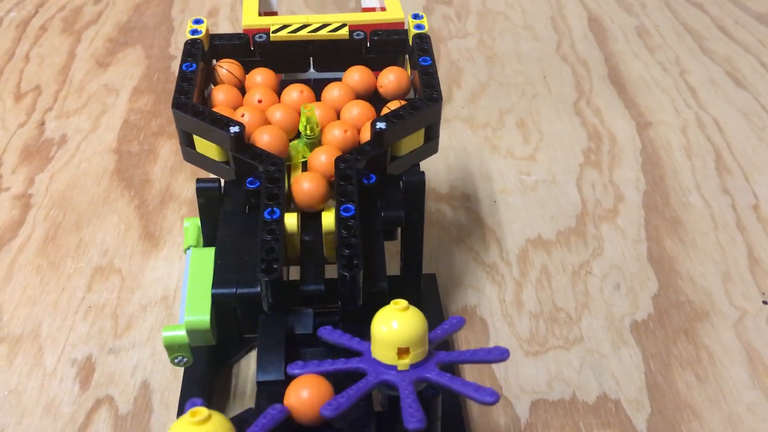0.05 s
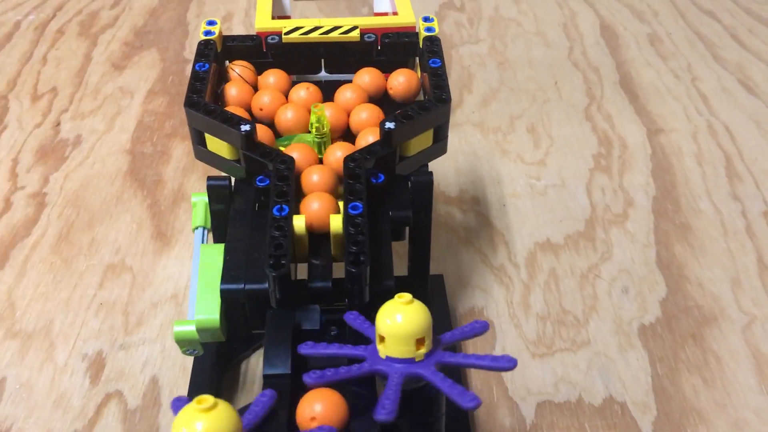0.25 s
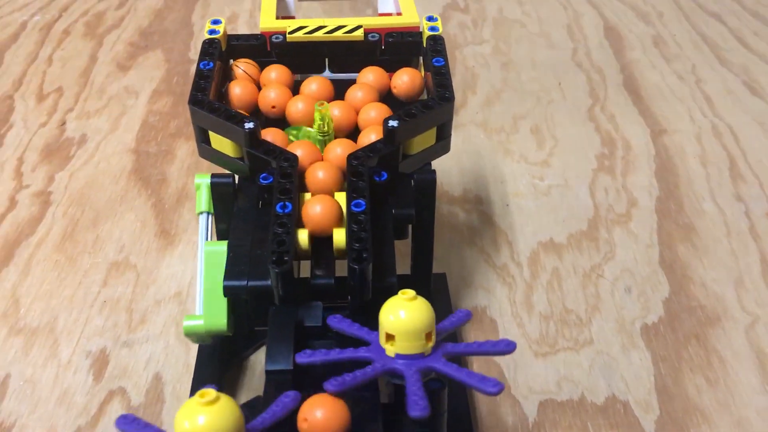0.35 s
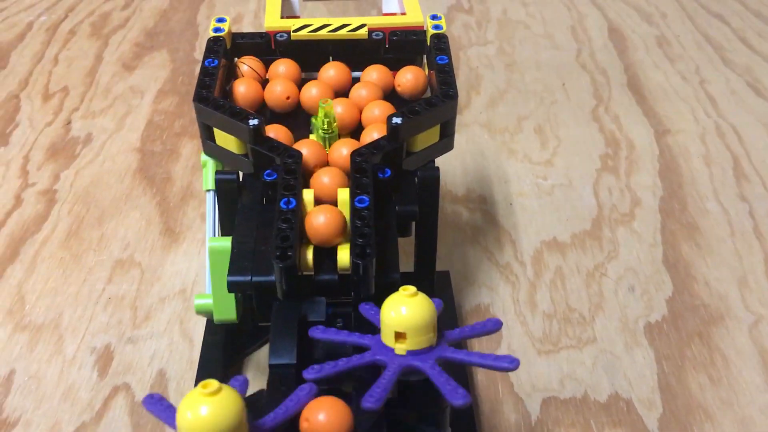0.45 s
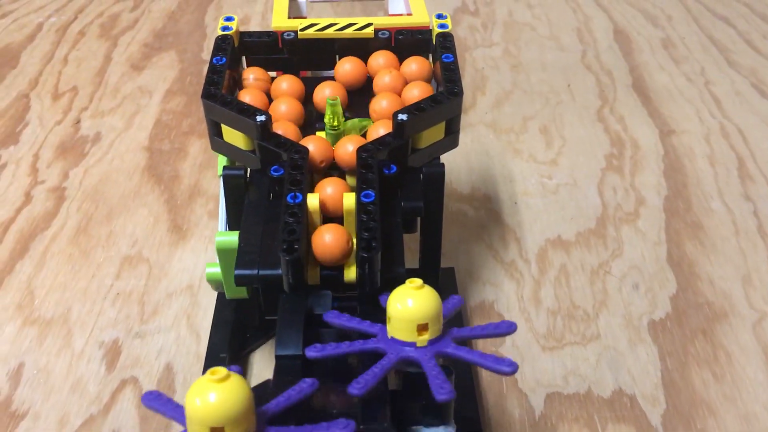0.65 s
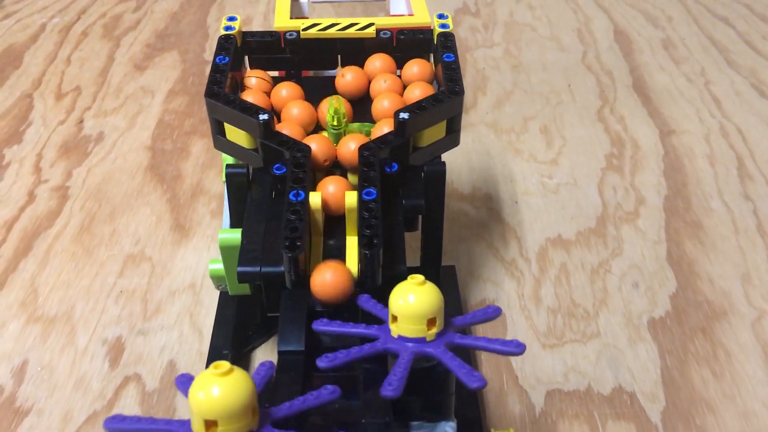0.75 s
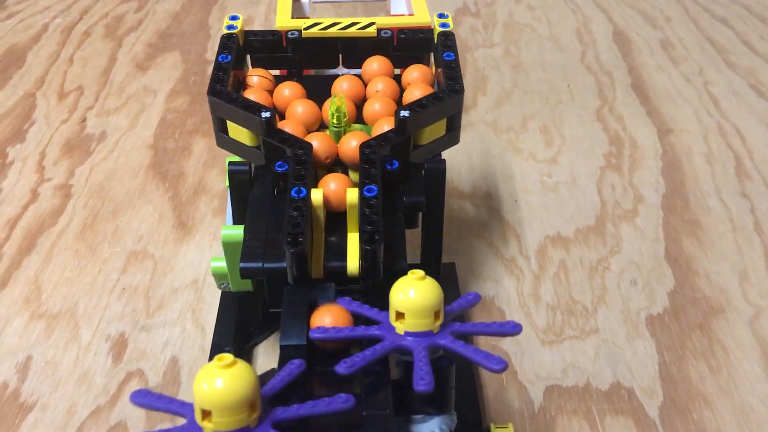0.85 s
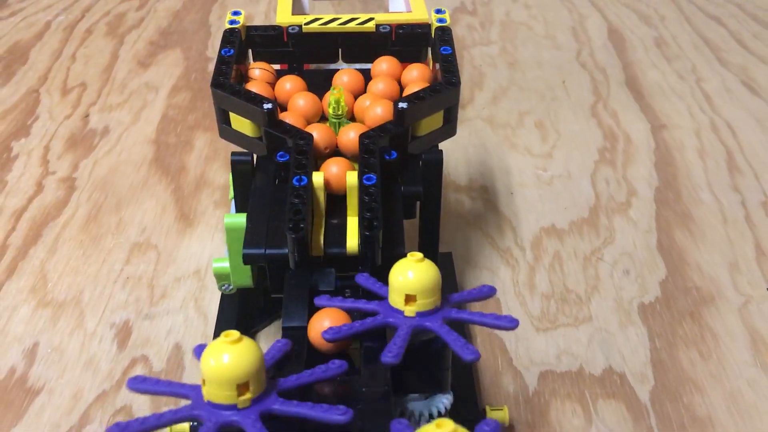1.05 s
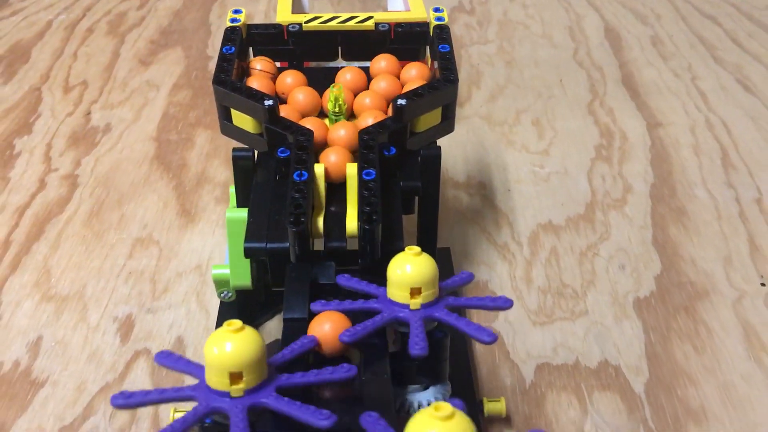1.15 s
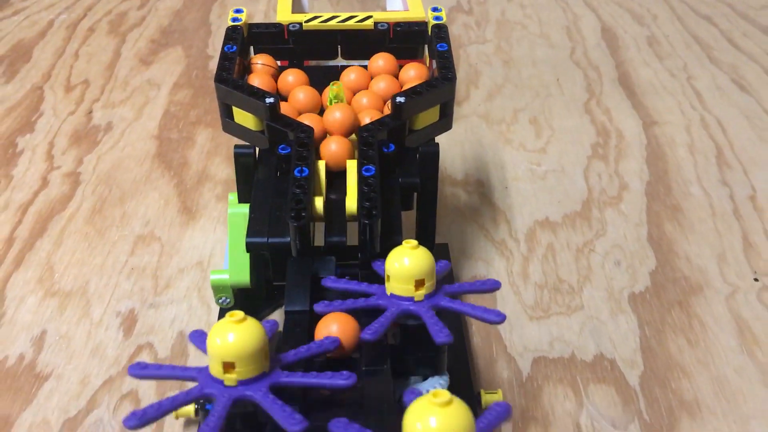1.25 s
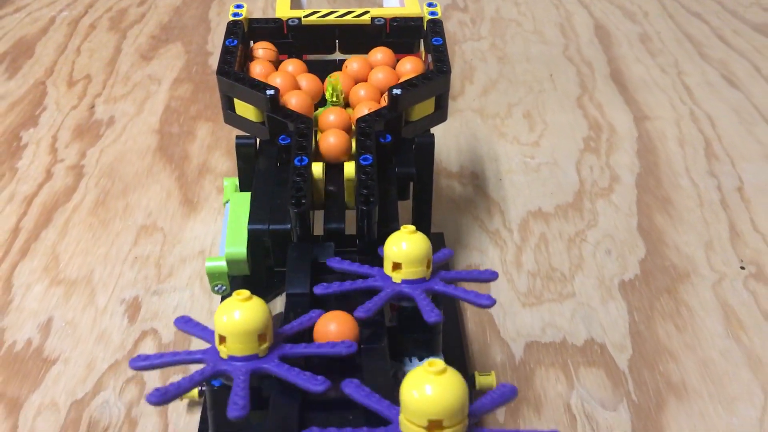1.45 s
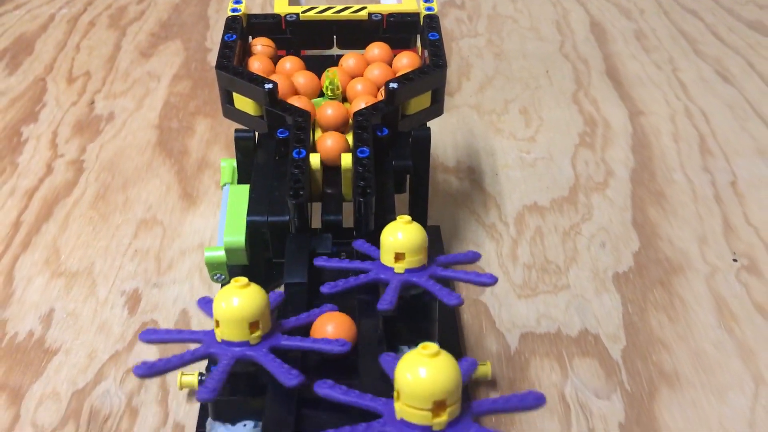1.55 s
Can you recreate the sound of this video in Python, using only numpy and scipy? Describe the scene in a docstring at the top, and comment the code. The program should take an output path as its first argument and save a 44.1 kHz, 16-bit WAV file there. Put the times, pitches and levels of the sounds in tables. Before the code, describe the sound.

Small plastic balls click and clack through a toy brick machine over a quiet motor whirr.

```python
"""Toy brick ball machine

Small hard plastic balls feed from a hopper through a motor-driven brick machine on a plywood table.
They click together, tick on bricks and knock in the chute, each hit a crack, a ring and a brief shake.
A lever drops with one loud clack that rings the frame and shakes the table.
The motor and its gears whirr quietly underneath, in a small room."""
import sys
import numpy as np
from scipy import signal
from scipy.fft import rfft, irfft
from scipy.io import wavfile

SR = 44100
rng = np.random.default_rng(int(sys.argv[2]) if len(sys.argv) > 2 else 0)


def unload_wav(signal):
    """Save mono or channel-first audio to the path in sys.argv[1] as 16-bit WAV at rate SR, clipped to [-1, 1]."""
    wavfile.write(
        sys.argv[1],
        SR,
        np.round(np.clip(np.atleast_2d(signal).T, -1, 1) * 32767).astype(np.int16),
    )


N = 70560


def amp(db):
    """Decibels to gain."""
    return 10 ** (np.asarray(db) / 20)


def unit(x):
    """Scales to an energy of one."""
    return x / np.sqrt(np.sum(x ** 2) + 1e-20)


def curve_at(points, hz):
    """Reads a curve on a log-frequency axis."""
    freqs, values = np.transpose(points)
    return np.interp(np.log(hz + 1), np.log(freqs + 1), values)


def add(mix, start_s, sound):
    """Mixes a sound in at its start time."""
    part = mix[round(start_s * SR):][:len(sound)]
    part += sound[:len(part)]


def equalise(x, eq):
    """Minimum-phase EQ through points of freq_hz, gain_db."""
    log_gain = np.log(amp(curve_at(eq, abs(np.fft.fftfreq(8192, 1 / SR)))))
    taps = np.fft.ifft(np.exp(np.conj(signal.hilbert(log_gain)))).real[:4096]
    return signal.fftconvolve(x, taps)[:len(x)]


def tail(decay, size):
    """Dense random echoes, each band dying at its own speed."""
    t, hz = np.arange(size) / SR, np.fft.rfftfreq(size, 1 / SR)
    noise = rfft(rng.choice([-1., 1.], size))
    centres = np.transpose(decay)[0]
    echoes = np.zeros(size)
    for centre, t60 in decay:
        band = irfft(noise * curve_at(np.c_[centres, centres == centre], hz), size)
        echoes += band * amp(-60 * t / t60)
    return unit(echoes)


def drift(rate_hz):
    """Slow random wander with an rms of one."""
    lowpass = np.exp(-(np.fft.rfftfreq(N, 1 / SR) / rate_hz) ** 2)
    return unit(irfft(rfft(rng.standard_normal(N)) * lowpass, N)) * np.sqrt(N)


def grains(per_s, max_db, spread_db=4):
    """Randomly timed impulses of uneven strength."""
    impulses = (rng.random(N) < per_s / SR) * rng.choice([-1, 1], N)
    return impulses * amp(np.minimum(spread_db * rng.exponential(1, N), max_db))


def strike(tilt_db_per_octave, modes, eq, decay, crack_db, ring_db, shake_db, size=8192):
    """One contact: a crack spread by bending waves, ringing modes and the shake of nearby bricks."""
    t, freqs = np.arange(size) / SR, np.fft.rfftfreq(size, 1 / SR)
    ring = unit(sum((-1) ** k * amp(db - 60 * t / t60) * np.sin(2 * np.pi * hz * t)
                    for k, (hz, db, t60) in enumerate(modes)))
    bend_delay_s = 0.000496  # at 1 kHz; the treble arrives first
    bending_wave = irfft(np.exp(-4j * np.pi * bend_delay_s * np.sqrt(1000 * freqs)), size)
    crack = unit(equalise(bending_wave, eq))
    shake = unit(equalise(tail(decay, size), eq))
    hit = amp(crack_db) * crack + amp(ring_db) * ring + amp(shake_db) * shake
    return unit(equalise(hit, [(750, 0), (12000, 4 * tilt_db_per_octave)]))


def strike_spot(hit, hz, boost_db, edge_ratio=1.35):
    """The spot that is struck favours one band of the ring."""
    return unit(equalise(hit, [(hz / edge_ratio, 0), (hz, boost_db), (hz * edge_ratio, 0)]))


# Shake dying away in the loose brickwork: freq_hz, t60_s
BRICKWORK_DECAY = [(300, 0.078), (1500, 0.07), (4500, 0.037), (9000, 0.019), (15000, 0.015)]
# Motor and gear tones: pitch_hz, relative_level_db
GEAR_TONES = [(113, -60), (150, -57.5), (344, -68.5), (457, -64), (912, -55.5), (1060, -60), (1389, -62),
              (1620, -58), (1965, -56.5), (2125, -61.5), (2295, -55.5), (2900, -65.5), (4312, -60.5)]
# Bed of gear noise and room hum: freq_hz, gain_db
WHIRR_EQ = [(20, -22), (40, -1.5), (65, 10.5), (100, -2.5), (155, -2), (210, -8.5), (350, -3.5), (540, -15),
            (700, -11.5), (950, -3), (1500, -6), (2100, 2.5), (2700, -5), (4400, -7.5), (6300, -4.5),
            (7500, -18.5), (8800, -6.5), (10300, -16), (11600, -7.5), (15500, -16.5)]


def motor(waver=0.005997, flutter_db=4, swell_db=1.26):
    """Wavering gear tones over a soft whirr and the fine rattle of teeth."""
    shared_drift = drift(6.15)
    whine = np.zeros(N)
    for hz, db in GEAR_TONES:
        level = np.sqrt(2) * amp(db + flutter_db * drift(18))
        speed = 1 + waver * (shared_drift + drift(42.2))
        whine += level * np.sin(2 * np.pi * hz * np.cumsum(speed) / SR)
    whirr = unit(equalise(rng.standard_normal(N), WHIRR_EQ)) * amp(swell_db * drift(24))
    teeth = grains(per_s=260, max_db=12)
    rattle = signal.fftconvolve(teeth, tail(BRICKWORK_DECAY, size=2048))[:N]
    rattle_eq = [(200, -28), (700, -13.5), (1100, -5), (5000, -11.5), (9000, -11.5), (16000, -24)]
    rattle = unit(equalise(rattle, rattle_eq))
    return amp(-1.5) * whine + np.sqrt(N) * (amp(-42) * whirr + amp(-47) * rattle)


# Short, high ring of a ball: pitch_hz, level_db, t60_s
BALL_MODES = [(2280, -18, .03), (3230, -14, .04), (3915, -6, .03), (4325, 0, .032), (4600, -7, .02),
              (5075, -4, .025), (5400, -10, .022), (5717, -6, .022), (6245, -11, .025), (6578, -9, .022),
              (7074, -9, .016), (8450, -10, .014)]
# Bright tone of a ball's crack and shake: freq_hz, gain_db
BALL_EQ = [(100, -35), (700, -29.5), (1400, -9), (2700, -14), (4400, 0.5), (6500, -1), (7800, -7.5),
           (10000, -7), (12500, -16), (16000, -41)]
# Swell and ebb of the jostling in the hopper: time_s, level_db
JOSTLE_ENVELOPE = [(0, -44.5), (.08, -44), (.14, -53), (.56, -81), (.63, -41), (.72, -52), (1.02, -53),
                   (1.2, -53), (1.35, -45), (1.45, -47.5), (1.6, -55)]


def hopper_jostle():
    """Many faint random contacts as the heap of balls settles."""
    touches = grains(per_s=350, max_db=8)
    click = strike(-2, BALL_MODES, BALL_EQ, BRICKWORK_DECAY, crack_db=-10, ring_db=-7.5, shake_db=-5)
    jostle = unit(signal.fftconvolve(touches, click)[:N]) * np.sqrt(N)
    return jostle * amp(np.interp(np.arange(N) / SR, *np.transpose(JOSTLE_ENVELOPE)))


# Hollow ring of the chute: pitch_hz, level_db, t60_s
CHUTE_MODES = [(901, -11, 0.074), (1169, 0.5, 0.055), (1560, -7, .05), (1702, 1.5, 0.053), (1857, 6, 0.054),
               (2000, -13, 0.061), (2445, -2, 0.04)]
# Dull tone of its crack and shake: freq_hz, gain_db
CHUTE_EQ = [(100, -18), (260, -9), (400, -9), (650, -14), (1100, -2), (2200, -2), (3000, -10), (6000, -20),
            (16000, -55)]
# Balls bumping along the chute: start_s, level_db, tilt_db_per_octave
CHUTE_KNOCKS = [(.015, -10.5, 3), (0.11, -22, -4), (0.334, 2, 4), (0.3434, 1, 0), (0.3586, -4, 2.5),
                (.4738, -10.5, 0), (.507, -10.5, -1), (0.5209, -6.5, -3), (.526, -12, -5),
                (0.5372, -6, -2.5), (0.5505, -8, 3), (0.7492, -7, 5), (.776, -12, 2.5), (0.86, -7.5, -3),
                (.917, -11, -5), (1.142, -10, 4), (1.1676, -8, 0), (1.172, -21, 3), (1.306, -1.5, 2),
                (1.3133, -7.5, 2.5), (1.358, -12.5, 0)]


def chute_knocks(detune=0.039):
    """Balls knock their way down the chute, where each spot rings a little differently."""
    out = np.zeros(N)
    for start_s, level_db, tilt in CHUTE_KNOCKS:
        modes = [(hz * (1 + detune * rng.uniform(-1.05, 1)), db, t60) for hz, db, t60 in CHUTE_MODES]
        knock = strike(tilt, modes, CHUTE_EQ, BRICKWORK_DECAY, crack_db=-18.5, ring_db=-2.5, shake_db=-4)
        add(out, start_s, amp(level_db) * knock)
    return out


# Ring of a brick: pitch_hz, level_db, t60_s
BRICK_MODES = [(1958, 3.5, 0.078), (3190, -9.5, 0.051), (3500, 3, 0.09), (4110, -11, 0.034),
               (5400, -21, 0.025), (5940, 11.5, 0.024), (8040, -43, .02)]
# Sharp tone of its crack and shake: freq_hz, gain_db
BRICK_EQ = [(100, -12.5), (600, -13.5), (1200, -5), (2600, -3.5), (4000, -1), (6300, -2.5), (9500, -7.5),
            (10800, -15.5), (16000, -12)]
# Ball or lever on a brick: start_s, level_db, tilt_db_per_octave, boost_hz, crack_db
BRICK_TICKS = [(0.0175, -18, -3, 4430, 6), (0.033, -12, -4, 4260, -12), (0.2248, 0.5, 1, 6800, 0.5),
               (0.2261, -6, 3, 12500, -19), (.236, -27, 9, 6500, 0), (0.2874, 4, 2.5, 4000, -3.5),
               (0.457, -21.5, 5, 8500, -5), (0.6775, -2, -1.5, 2870, 1), (0.689, -8, -1, 4130, 0),
               (0.7442, -9, -2.5, 4200, -11), (.8335, -11.5, -4.5, 4450, 6), (0.8432, -3, -1, 4540, -2.5),
               (.8576, -9, -4.5, 2500, -5), (1.097, -8.5, -2.5, 5900, -3), (1.2623, -1, 0.1, 3110, -3.5),
               (1.3102, -4.5, 1, 5260, -16), (1.34, -8, 0, 3860, -3), (1.5244, -6, 1.5, 3500, -4)]


def brick_ticks():
    """Dry, sharp ticks as the bricks of the hopper are struck."""
    out = np.zeros(N)
    for start_s, level_db, tilt, hz, crack_db in BRICK_TICKS:
        tick = strike(tilt, BRICK_MODES, BRICK_EQ, BRICKWORK_DECAY, crack_db, ring_db=-2.5, shake_db=3.5)
        add(out, start_s, amp(level_db) * strike_spot(tick, hz, boost_db=6))
    return out


# Early reflections off the machine's walls and the table: delay_s, gain_db
REFLECTIONS = [(.0016, -13), (.0029, -23), (.0054, -17.5)]
# Ball on ball: start_s, level_db, tilt_db_per_octave, boost_hz, crack_db
BALL_CLICKS = [(0.2183, -6, -7, 4340, -17), (0.2598, -14, -6, 4270, -12), (.302, -12.5, -7, 4730, 9),
               (0.6123, -15, 3, 4600, -9), (0.6243, -11, -7.5, 4540, -6), (0.9143, 8.5, .5, 5600, 2.5),
               (.967, 7, 0, 3980, -9.5), (0.9957, 1, -2, 4000, -7), (1.013, -8, -3.5, 4170, -4),
               (1.0823, -5.5, -4.5, 4300, 3), (1.4937, -20, 5, 5400, -8), (1.509, -5.5, -7, 4860, 5)]


def ball_clicks():
    """Hard balls click together with a short, high ring that echoes between the bricks."""
    out = np.zeros(N)
    for start_s, level_db, tilt, hz, crack_db in BALL_CLICKS:
        click = strike(tilt, BALL_MODES, BALL_EQ, BRICKWORK_DECAY, crack_db, ring_db=-0.5, shake_db=-3)
        click = amp(level_db) * strike_spot(click, hz, boost_db=4.5)
        add(out, start_s, click)
        for delay_s, gain_db in REFLECTIONS:
            add(out, start_s + delay_s, amp(gain_db) * click)
    return out


# Ring of the whole frame: pitch_hz, level_db, t60_s
FRAME_MODES = [(155, -21, .18), (250, -15, .1), (322, -12, .11), (375, -9, .08), (425, -9, .1),
               (571, -13, .09), (745, 1, .05), (846, 4, .08), (905, -4, .05), (1067, 2, .08),
               (1162, -2, .09), (1216, -4, .09), (1421, 0, .06), (1530, -2, .05), (1627, 2, .06),
               (1764, 0, .06), (1827, -5, .06), (2330, -7, .05), (2495, -5, .06), (2555, -7, .06),
               (3000, -10, .04), (3273, -8, .04), (3591, -9, .04)]
# Mid-heavy tone of its crack and shake: freq_hz, gain_db
FRAME_EQ = [(50, -21), (150, -17.5), (380, -2), (620, -11), (850, 3.5), (1700, 2), (2100, -3.5),
            (3500, -5.5), (4500, -14.5), (9000, -17.5), (11000, -24.5), (16000, -30)]
# Shake dying away in the frame: freq_hz, t60_s
FRAME_DECAY = [(150, 0.13), (800, 0.076), (2000, 0.027), (5000, 0.092), (14000, 0.066)]
# The lever's landing and chatter: start_s, level_db, tilt_db_per_octave, ring_db
LEVER_HITS = [(.3145, 15, .5, 1.5), (0.3158, 11.5, 1, -37), (.32, 7.5, -2, -33), (0.3417, -2, -1.5, -32),
              (.36, -3, -1.5, -17), (0.386, -15.5, -5.5, -3)]


def lever_clack():
    """The lever lands hard, rings the whole frame and chatters to rest."""
    out = np.zeros(N)
    for start_s, level_db, tilt, ring_db in LEVER_HITS:
        clack = strike(tilt, FRAME_MODES, FRAME_EQ, FRAME_DECAY,
                       crack_db=-3, ring_db=ring_db, shake_db=-0.5)
        add(out, start_s, amp(level_db) * clack)
    return out


# Blows that set the plywood swinging: start_s, level_db
TABLE_THUMPS = [(0.3148, -31.5), (.645, -44.5), (0.913, -43), (1.304, -44.5)]


def table_thumps(pitch_hz=65.1, peak_s=0.043, sharpness=2.86):
    """The plywood swings up after a blow and dies away in a soft, low thump."""
    out, t = np.zeros(N), np.arange(SR // 2) / SR
    envelope = (t / peak_s * np.exp(1 - t / peak_s)) ** sharpness
    for start_s, level_db in TABLE_THUMPS:
        add(out, start_s, amp(level_db) * envelope * np.sin(2 * np.pi * pitch_hz * t))
    return out


# Reverb time of the room: freq_hz, t60_s
ROOM_DECAY = [(100, 0.26), (1000, 0.24), (4000, 0.18), (14000, 0.2)]


def room(x, wet_db, predelay_s=.005):
    """Adds the short reverb of a small room."""
    reverb = np.zeros(N)
    add(reverb, predelay_s, signal.fftconvolve(x, tail(ROOM_DECAY, size=16384)))
    return x + amp(wet_db) * reverb


def scene():
    """The machine on its table, heard in mono from close above."""
    lever = room(lever_clack(), wet_db=-14)
    balls = room(ball_clicks() + hopper_jostle(), wet_db=-20.5)
    bricks = room(brick_ticks() + chute_knocks(), wet_db=-13)
    return (lever + balls + bricks + table_thumps() + motor())[None]


def record(dry, low_cut_hz=25, high_cut_hz=16000):
    """Output chain: low cut, hard clip at full scale, high cut."""
    low_cut = signal.butter(3, low_cut_hz, "high", fs=SR, output="sos")
    high_cut = signal.firwin(511, high_cut_hz, window=("kaiser", 9), fs=SR)
    clipped = np.clip(signal.sosfilt(low_cut, dry), -1, 1)
    return signal.oaconvolve(clipped, high_cut[None], "same")


dry = scene()
out = record(dry)
unload_wav(out)
```